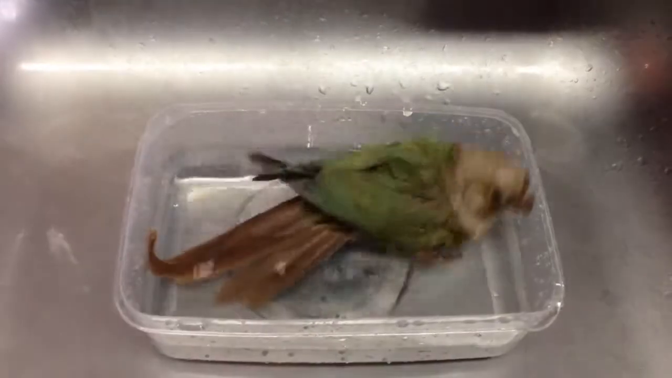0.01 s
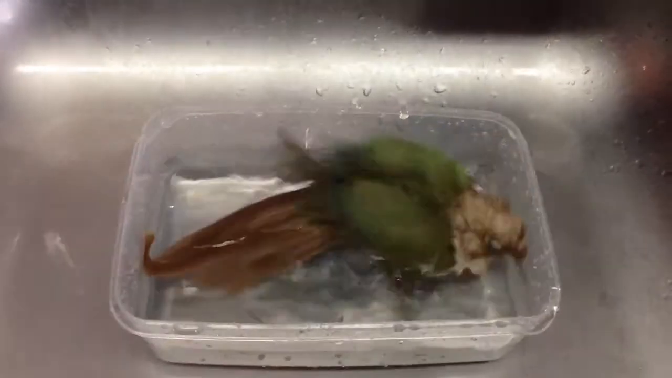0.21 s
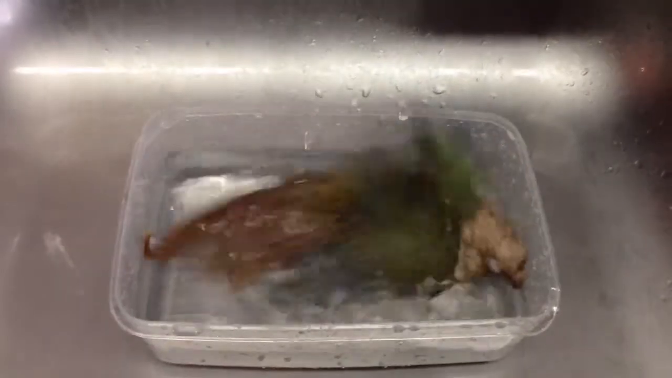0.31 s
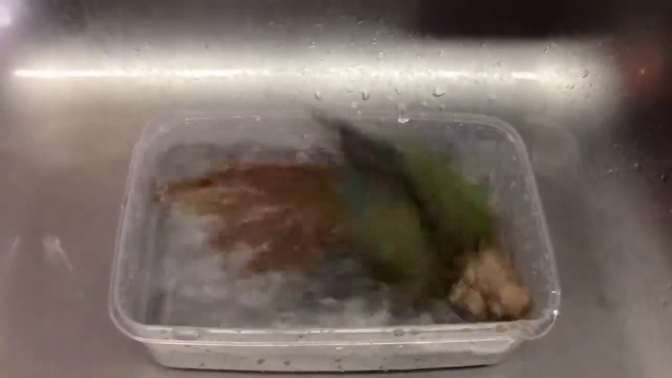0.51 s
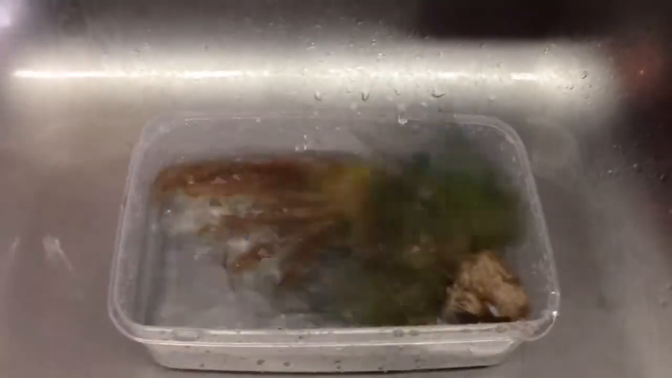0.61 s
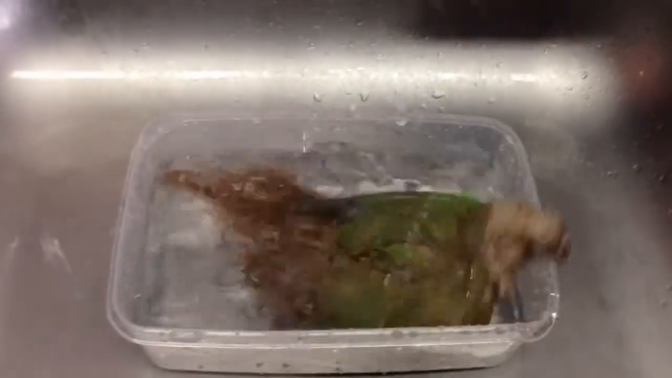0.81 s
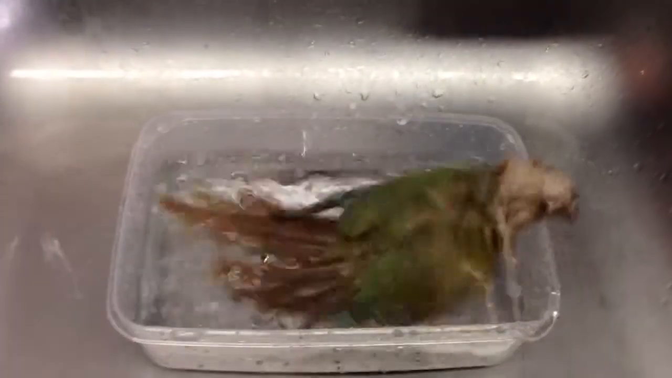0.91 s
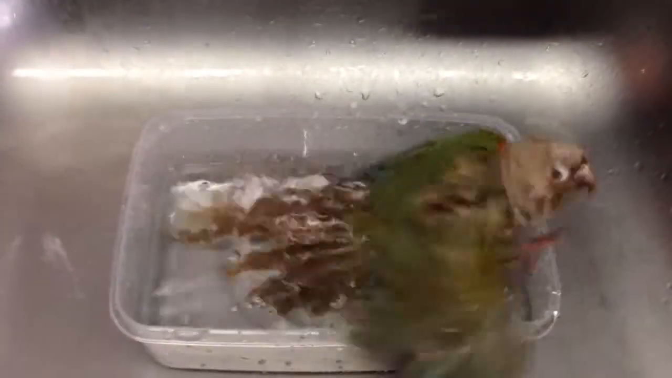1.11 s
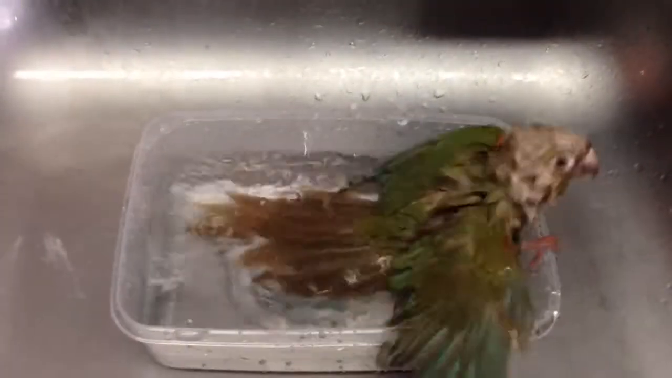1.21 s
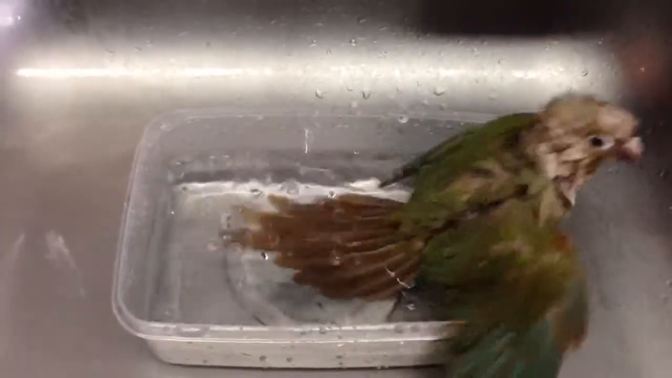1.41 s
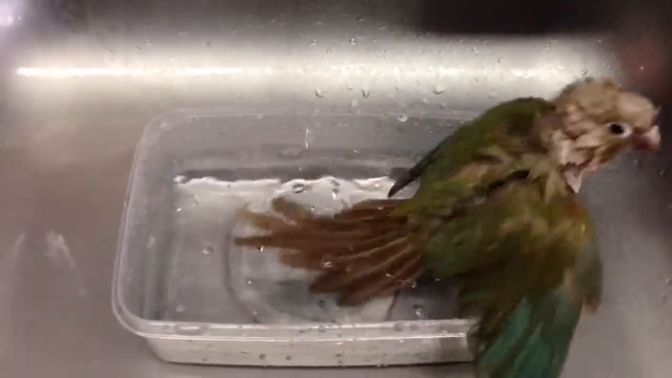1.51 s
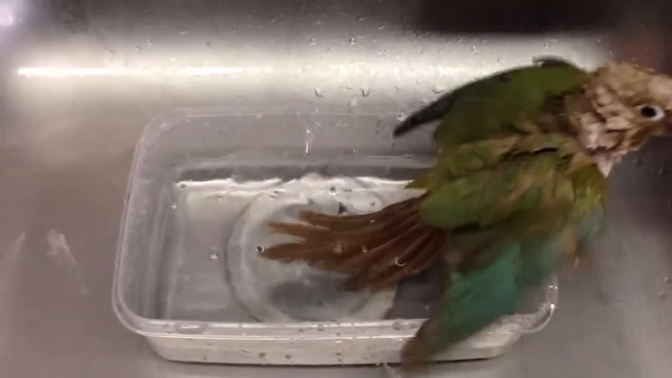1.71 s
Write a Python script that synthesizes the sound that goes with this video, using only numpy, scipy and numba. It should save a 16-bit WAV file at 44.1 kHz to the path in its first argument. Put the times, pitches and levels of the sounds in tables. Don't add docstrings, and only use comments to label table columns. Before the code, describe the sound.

Close splashing of a small bird in a plastic tub inside a steel sink, fluttering bursts with bright droplets and a floor thump, then a weaker splash and scattered drips over faint room hum.

```python
import sys
import numpy as np
from scipy import signal
from scipy.fft import rfft, irfft
from scipy.io import wavfile
from scipy.ndimage import uniform_filter1d
from numba import njit

SR = 44100
rng = np.random.default_rng(int(sys.argv[2]) if len(sys.argv) > 2 else 0)


def volts(x):
    e = np.asarray(x, float) / 20
    return 10 ** e


def to_wav(sig):
    pcm = np.clip(np.atleast_2d(sig), -1, 1) * 32767
    pcm = np.round(pcm).astype(np.int16)
    wavfile.write(sys.argv[1], SR, pcm.T)


N = 79380

# start in [s], peak level in [dB].
SLAPS = [(0.208, -34.5), (.312, -29.5), (.338, -33), (0.344, -47), (0.367, -29.5), (0.3889, -29.5),
         (0.451, -33), (.548, -43), (0.571, -39), (.599, -43), (.632, -45), (.641, -57), (0.6638, -40.5),
         (.685, -25), (0.691, -17), (0.6963, -20.5), (0.719, -36), (0.7274, -20), (.775, -36), (0.792, -45),
         (0.813, -34), (.8607, -49), (.903, -47), (.9263, -35.5), (0.968, -63), (1.108, -58), (1.134, -39),
         (1.1426, -46), (1.1895, -30), (1.208, -39), (1.227, -47)]
BUBBLE_GLIDE = 0.042


def band(x, lo_hz, hi_hz):
    edges_hz = [lo_hz, min(hi_hz, 0.45 * SR)]
    return signal.sosfilt(signal.butter(2, edges_hz, "band", fs=SR, output="sos"), x)


def unit(x):
    return x / np.sqrt(np.mean(x ** 2))


def coloured(points):
    hz, db = np.array(points).T
    bins_hz = np.maximum(np.arange(N // 2 + 1) * SR / N, 1)
    gain = volts(np.interp(np.log(bins_hz), np.log(hz), db))
    return unit(irfft(rfft(rng.standard_normal(N)) * gain, N))


def walk(rate_hz):
    k = int(SR / rate_hz)
    return unit(uniform_filter1d(uniform_filter1d(rng.standard_normal(N), k), k))


@njit
def rings(n, start, w, cycles, glide, size, rise):
    y = np.zeros(n)
    for k in range(len(start)):
        span = cycles[k] * 2 * np.pi / w[k]
        for i in range(int(span)):
            j = int(start[k]) + i
            if 0 <= j < n:
                swell = (1 - np.exp(-i / rise)) ** 2
                decay = np.exp(-6.9 * i / span)
                phase = w[k] * i * (1 + glide[k] * i / span)
                y[j] += size[k] * swell * decay * np.sin(phase)
    return y


def ring(s, hz, cycles, glide, db, rise_s):
    one = np.ones(len(s))
    w = 2 * np.pi * np.clip(hz, 50, 17000) / SR * one
    return rings(N, s * SR, w, cycles * one, glide * one, volts(db) * one, max(rise_s, 1e-5) * SR)


def fades(rows, t60_s, rise_s):
    t = np.arange(N) / SR
    total = np.zeros(N)
    for s, db in rows:
        fade = volts(db - 60 * np.clip(t - s, 0, 1) / t60_s)
        total += fade * np.clip((t - s) / rise_s, 0, 1)
    return total


def fizz(count, scatter_db):
    place, rarity = rng.random((count, 2)).T
    hz = 3270 * 2 ** (0.86 * rng.standard_normal(count))
    db = -scatter_db * np.log(rarity + 0.0054)
    ring_s, rise_s = 0.0099, 0.000047
    return unit(ring(place * N / SR, hz, ring_s * hz, 0.082, db, rise_s))


def ticks(count):
    place, pitch, rarity = rng.random((count, 3)).T
    hz = 2000 * 7 ** pitch
    db = -4.5 * np.log(rarity + 0.0022)
    return unit(ring(place * N / SR, hz, 1.14, 0.0, db, 0.00005))


def churn():
    # time in [s], level in [dB].
    effort_curve = [(0, -64), (0.061, -71), (.15, -68.5), (0.201, -53), (.25, -64.5), (0.299, -57.5),
                    (0.332, -46.5), (.46, -52.5), (.58, -52.5), (0.656, -60), (0.696, -39.5), (0.834, -43),
                    (.95, -61.5), (1.0, -67), (1.1, -61.5), (1.173, -46), (1.264, -68), (1.8, -67.5)]
    # frequency in [Hz], density in [dB per Hz].
    spray_colour = [(88, -41), (150, -33.5), (249, 2.5), (475, -14), (589, -15), (1260, -12), (3420, -6.5),
                    (14500, -16.5), (16000, -23)]
    s, db = np.array(effort_curve).T
    effort = volts(np.interp(np.arange(N) / SR, s, db))
    wash = coloured(spray_colour) * volts(3.1 * walk(67))
    slosh = unit(band(rng.standard_normal(N), 186, 1370)) * volts(2 * walk(21))
    heave = unit(band(rng.standard_normal(N), 49, 82))
    water = volts(-4) * fizz(count=900, scatter_db=1)
    water += volts(-10) * ticks(count=1200)
    water += volts(-3.5) * wash
    water += volts(-11.5) * slosh
    water += volts(-41) * heave
    return effort * water


def slaps():
    # start in [s], level in [dB].
    swish_rows = [(.016, -57), (.027, -60), (.164, -59), (.191, -64), (.212, -50), (.312, -55), (.345, -63),
                  (.372, -47.5), (.44, -45), (.498, -46.5), (.548, -48), (.57, -59), (.665, -56),
                  (.69, -40.5), (.727, -47), (.773, -46), (.794, -55), (.811, -49.5), (.83, -64),
                  (.862, -50.5), (.903, -67), (1.068, -53), (1.132, -62), (1.155, -49), (1.19, -54),
                  (1.493, -58.5), (1.622, -54.5)]
    shape = volts(-9.5) * fades(SLAPS, t60_s=0.011, rise_s=0.00028)
    shape += fades(swish_rows, t60_s=0.075, rise_s=0.00047)
    hiss = unit(band(rng.standard_normal(N), 1700, 15000))
    burst = hiss * volts(0.95 * walk(330))
    burst += volts(1.5) * band(fizz(count=4000, scatter_db=6.0), 1200, 13700)
    burst += volts(-11.5) * ticks(count=2000)
    return shape * burst


def snaps():
    s, db = np.array(SLAPS).T
    return band(ring(s, 6100.0, 2.0, 0.0, db + 9, 0.00001), 1200, 17000)


def specks():
    # start in [s], peak level in [dB], pitch in [Hz].
    speck_rows = [(.018, -38, 7940), (0.028, -39, 9640), (.029, -38, 5360), (.338, -35, 7140),
                  (0.345, -30, 4070), (0.352, -36, 9700), (0.359, -33, 3200), (0.371, -35, 3870),
                  (.375, -34, 7160), (.389, -31.5, 9000), (.394, -35, 4040), (0.42, -29, 3770),
                  (0.421, -26.5, 2600), (.444, -35, 7500), (0.449, -27, 4030), (0.455, -28.5, 5770),
                  (0.461, -28, 3240), (0.47, -39, 4550), (.487, -48, 7000), (0.487, -37, 3440),
                  (0.502, -28, 4660), (0.503, -35, 5400), (0.52, -33, 4200), (0.549, -27.5, 6360),
                  (.57, -28, 2200), (.587, -29, 3150), (.598, -41, 3500), (.605, -43, 5300),
                  (0.672, -28, 4430), (.685, -35, 7100), (0.698, -21, 5660), (.703, -30, 7400),
                  (0.7255, -22.5, 10360), (0.7759, -18.5, 4080), (.786, -19, 2560), (0.812, -27, 6700),
                  (0.813, -36, 5000), (0.827, -35, 9600), (0.8603, -25, 5200), (.913, -39, 7400),
                  (.92, -34, 3730), (.929, -37, 3770), (1.059, -46, 5470), (1.133, -36.5, 4600),
                  (1.146, -35, 4700), (1.16, -44, 7440), (1.189, -24.5, 6440), (1.5814, -44, 1550),
                  (1.631, -37, 2250), (1.7475, -40.5, 13100)]
    s, db, hz = np.array(speck_rows).T
    ring_s, rise_s = 0.0056, 0.00023
    return ring(s, hz, ring_s * hz, 0.047, db, rise_s)


def bubbles():
    # start in [s], peak level in [dB], pitch in [Hz], ring time in [s].
    main_rows = [(0.2165, -18.5, 2170, 0.0078), (0.3117, -15, 3820, 0.0059), (0.337, -22.5, 560, 0.0075),
                 (0.3625, -25.5, 1970, 0.0081), (0.385, -30, 2810, 0.0095), (0.412, -20.5, 5700, 0.0062),
                 (0.4504, -17.5, 2320, 0.0048), (0.4987, -14.5, 3650, 0.0049), (0.536, -30, 1980, .011),
                 (0.549, -22, 4710, .006), (0.56, -28, 1940, 0.0083), (0.581, -21, 3310, 0.007),
                 (0.587, -20.5, 2030, 0.0052), (0.62, -29, 2300, 0.0067), (0.641, -31.5, 1840, 0.011),
                 (0.675, -31, 2170, 0.013), (0.691, -6.5, 3740, 0.0055), (0.693, -12, 1480, 0.007),
                 (0.727, -17.5, 2060, 0.0056), (0.772, -14.5, 3244, 0.0088), (0.7809, -11.5, 3320, 0.0053),
                 (0.8197, -16, 4270, 0.0049), (0.841, -20, 2070, 0.0062), (0.861, -20, 3850, 0.0069),
                 (0.903, -27, 3600, 0.013), (1.19, -28.5, 1820, 0.012)]
    # start in [s], peak level in [dB], pitch in [Hz].
    more_rows = [(0.2085, -26, 1000), (0.212, -22.5, 2700), (.222, -31, 1500), (.313, -23, 1860),
                 (.496, -27, 2220), (0.535, -27, 3130), (.54, -24, 1900), (.695, -13, 4750),
                 (.695, -20, 2800), (0.702, -20.5, 1430), (0.731, -40, 3900), (.77, -24.5, 970),
                 (.783, -18, 2130), (.812, -21.5, 595), (0.833, -26.5, 8800), (.904, -30, 2270),
                 (.908, -31, 4800), (.915, -38.5, 980), (.693, -17, 860), (1.631, -41.5, 660),
                 (1.342, -47, 4200), (0.216, -25.5, 4700), (.341, -37, 750), (1.493, -44.5, 980),
                 (1.519, -40, 740), (1.268, -42.5, 5700), (.003, -39.5, 1120), (0.00593, -39, 400),
                 (1.05, -40, 720), (.692, -20, 564)]
    more_ring_s, rise_s = 0.008, 0.00051
    rows = main_rows + [row + (more_ring_s,) for row in more_rows]
    s, db, hz, ring_s = np.array(rows).T
    cycles = ring_s * hz
    y = ring(s - rise_s / 2, hz, cycles, BUBBLE_GLIDE, db + 0.5, rise_s)

    spread = 0.13 * np.clip(0.0091 / ring_s, 0, 1) ** 2
    swarm_db = db - 5 + 18 * np.log10(np.clip(ring_s / 0.0081, 0, 1))
    for k in range(4):
        jitter, detune = rng.standard_normal((2, len(s)))
        late_s = 0.66 * ring_s * (k + 1 + 0.3 * jitter) / 3
        y += ring(s + late_s, hz * (1 + spread * detune), cycles, BUBBLE_GLIDE,
                  swarm_db - 2.0 * k, rise_s)
    return y


def singers():
    # start in [s], peak level in [dB], pitch in [Hz], ring time in [s].
    singer_rows = [
        (1.034, -40.5, 3156, 0.037),
        (1.083, -45.5, 962, 0.048),
        (1.114, -41, 1825, 0.035),
        (1.123, -35, 1840, 0.038),
        (1.161, -31, 4400, 0.047),
    ]
    s, db, hz, ring_s = np.array(singer_rows).T
    return ring(s, hz, ring_s * hz, BUBBLE_GLIDE, db, rise_s=0.0045)


def drops():
    # start in [s], peak level in [dB], pitch in [Hz].
    drop_rows = [
        (0.2163, -21.5, 2540),
        (0.7272, -34, 1960),
        (0.861, -31.5, 3520),
        (1.3255, -44, 4020),
        (1.4921, -31, 3550),
        (1.5429, -36.5, 2620),
        (1.5808, -26.5, 2050),
        (1.6228, -40, 8500),
        (1.6298, -30.5, 1570),
        (1.7475, -37, 12000),
    ]
    s, db, hz = np.array(drop_rows).T
    cycles = 5.3 * (hz / 2000) ** 0.12
    y = ring(s, hz, cycles, 0.0, db, 0.0001)
    noise = rng.standard_normal(N)
    for start_s, peak_db, pitch_hz in drop_rows:
        crack = unit(band(noise, 0.4 * pitch_hz, 3.05 * pitch_hz))
        y += crack * fades([(start_s, peak_db - 8.5)], t60_s=0.0067, rise_s=0.0012)
    return y


def tub():
    # start in [s], peak level in [dB].
    thump_rows = [(.002, -53), (0.17, -46.5), (0.218, -36.5), (.319, -37), (.34, -33), (0.368, -49),
                  (.7, -15.5), (.74, -31), (0.768, -30), (0.812, -32.5), (.848, -28), (0.86, -36.5),
                  (0.91, -35), (1.056, -46.5), (1.109, -49), (1.157, -44), (1.208, -36), (1.299, -47),
                  (1.52, -44), (1.528, -35), (1.57, -46), (1.634, -39.5)]
    # frequency in [Hz], level in [dB], T60 in [s].
    floor_modes = [(144.5, -22.5, 0.12), (251.9, -5.5, 0.13), (279.3, -13.5, 0.21), (364.4, -11.5, 0.088),
                   (611.6, -16.5, 0.07)]
    s, db = np.array(thump_rows).T
    rise_s = 0.005705
    lift = 0.08 * (s > 1.4)
    y = np.zeros(N)
    for hz, mode_db, t60_s in floor_modes:
        detune, uneven = rng.standard_normal((2, len(s)))
        pitch_hz = hz * (1 + lift + 0.018 * detune)
        level_db = db + mode_db + 2.0 * uneven
        y += ring(s - 1.4 * rise_s, pitch_hz, hz * t60_s, 0.0, level_db, rise_s)
    return y


def sink(near):
    t = np.arange(int(0.25 * SR)) / SR
    t60_s, gap_s = 0.064, 0.0015
    tail = rng.standard_normal(len(t)) * volts(-60 * t / t60_s) * (t > gap_s)
    tail = band(tail / np.sqrt(np.sum(tail ** 2)), 196, 12300)
    return volts(-6.5) * signal.fftconvolve(near, tail)[:N]


def kitchen():
    # frequency in [Hz], density in [dB per Hz].
    room_colour = [(15, -69), (25, -28), (117, -20), (677, 0), (887, -6), (1160, -9), (1330, -15),
                   (12500, -10.5), (16000, -13)]
    # frequency in [Hz], width in [Hz], level in [dB].
    hum_rows = [(132, 46, -9), (322, 142, -5.5), (4000, 610, -9.5)]
    # time in [s], frequency in [Hz], level in [dB].
    whine_path = [(1.5, 14100, -80), (1.561, 13700, -73), (1.62, 13400, -84), (1.665, 13100, -84),
                  (1.688, 12750, -72), (1.738, 12660, -70), (1.765, 12870, -66), (1.783, 12715, -82),
                  (1.8, 12620, -71)]
    s, hz, db = np.array(whine_path).T
    t = np.arange(N) / SR
    phase = 2 * np.pi * np.cumsum(np.interp(t, s, hz)) / SR
    flicker = volts(3.0 * walk(120))
    whine = flicker * volts(np.interp(t, s, db, left=-140)) * np.sin(phase)
    room = coloured(room_colour)
    for centre_hz, wide_hz, hum_db in hum_rows:
        hum = unit(band(rng.standard_normal(N), centre_hz - wide_hz / 2, centre_hz + wide_hz / 2))
        room += volts(hum_db + 0.5 * walk(34)) * hum
    return volts(-66 + walk(2.9) / 2) * room + whine


def scene():
    near = churn() + slaps() + snaps() + specks() + bubbles() + singers() + drops() + tub()
    near = band(near, 55, 20000)
    return (near + sink(near) + kitchen())[None]


def band_limit(x):
    return signal.sosfilt(signal.butter(12, 16310, fs=SR, output="sos"), x)


def record(dry):
    bass_cut = signal.butter(1, 90, "high", fs=SR, output="sos")
    top_cut = signal.ellip(6, 0.5, 30, 15350, fs=SR, output="sos")
    mix = signal.sosfilt(top_cut, signal.sosfilt(bass_cut, dry))
    return band_limit(mix)


dry = scene()
out = record(dry)
to_wav(out)
```